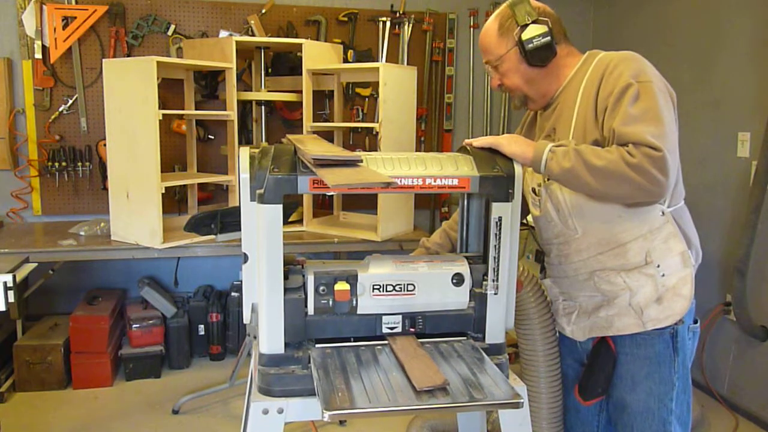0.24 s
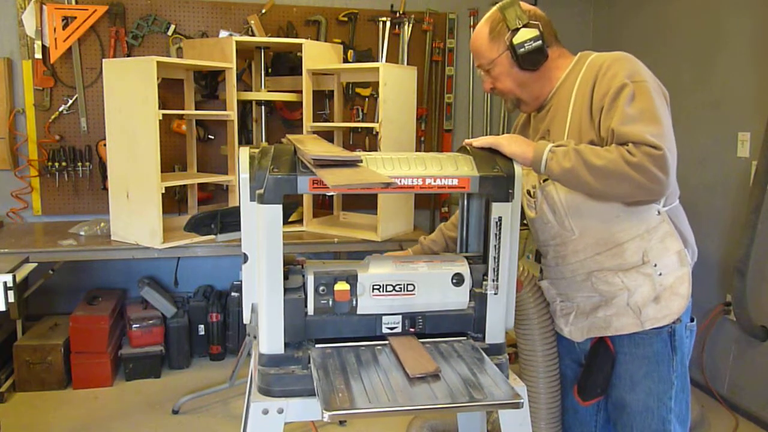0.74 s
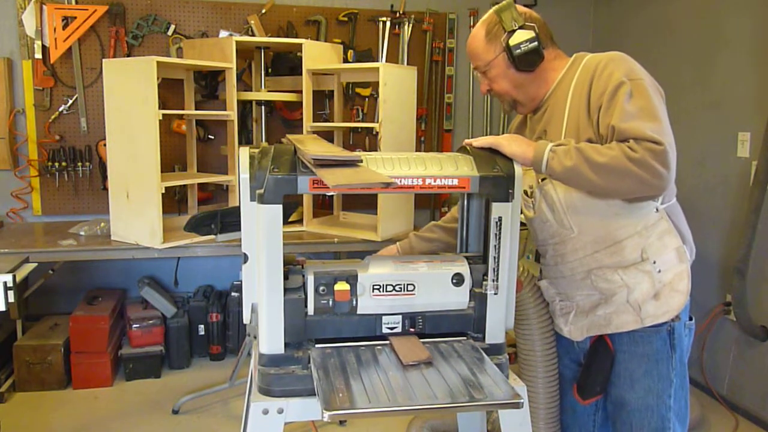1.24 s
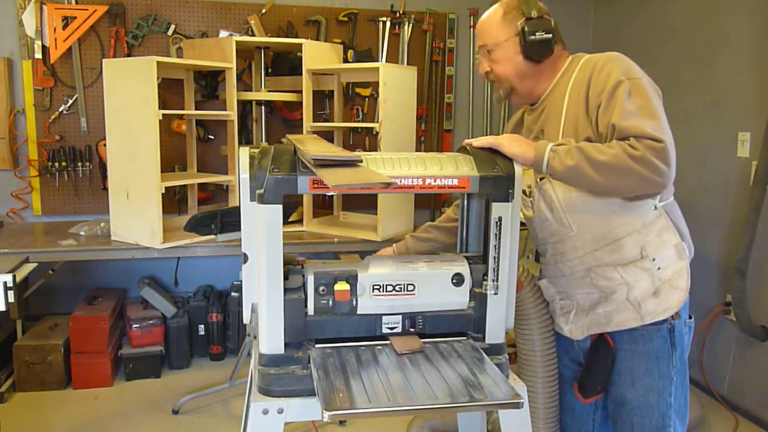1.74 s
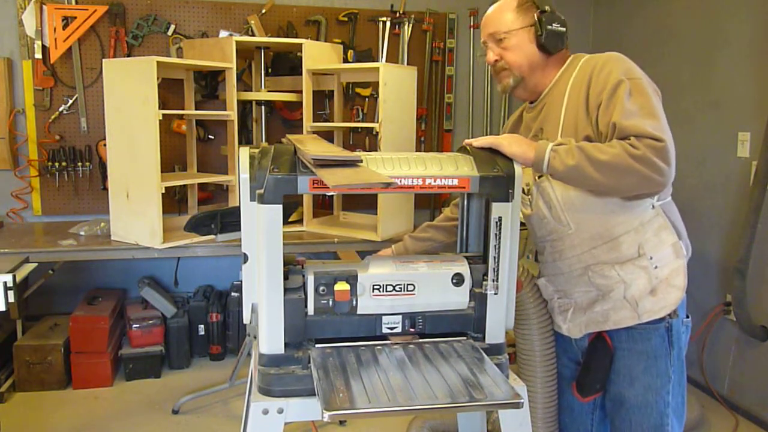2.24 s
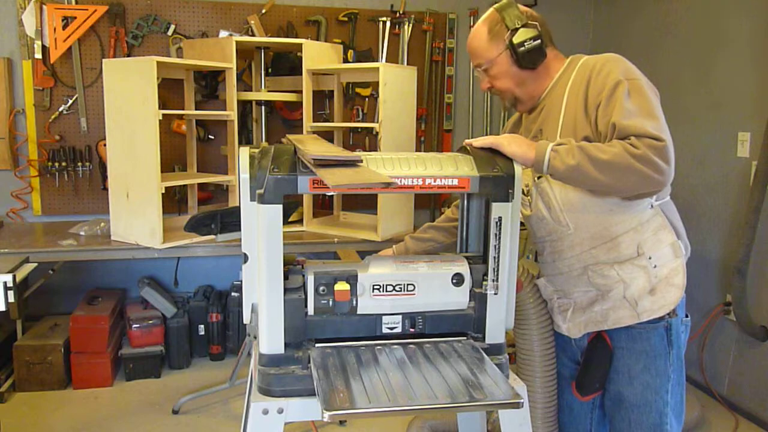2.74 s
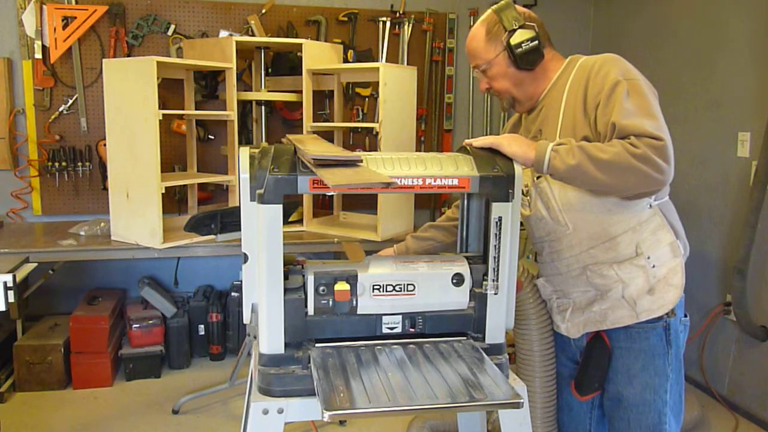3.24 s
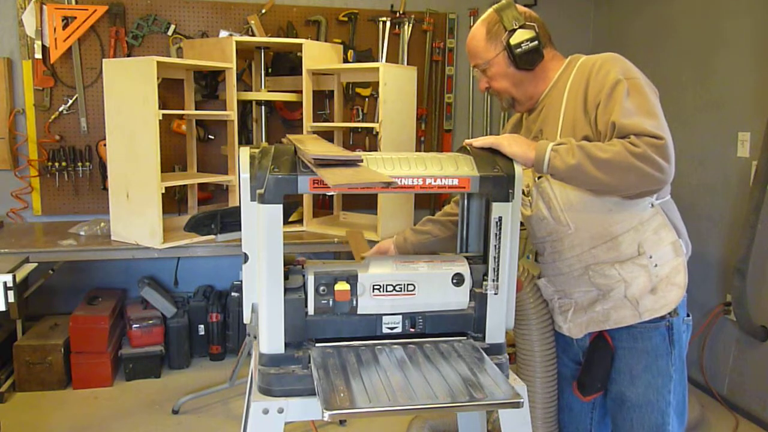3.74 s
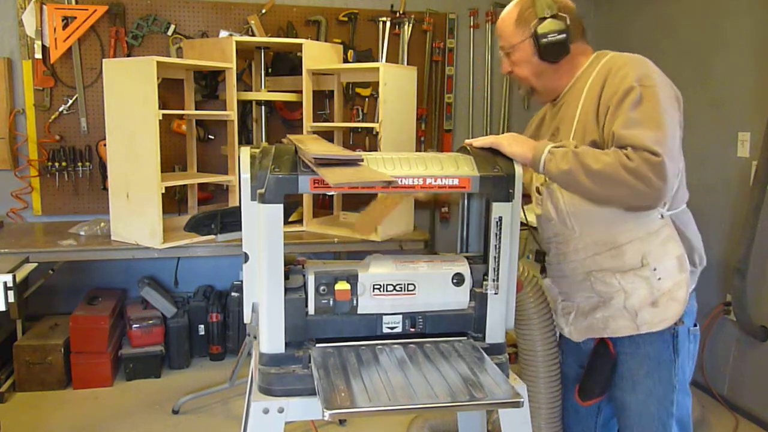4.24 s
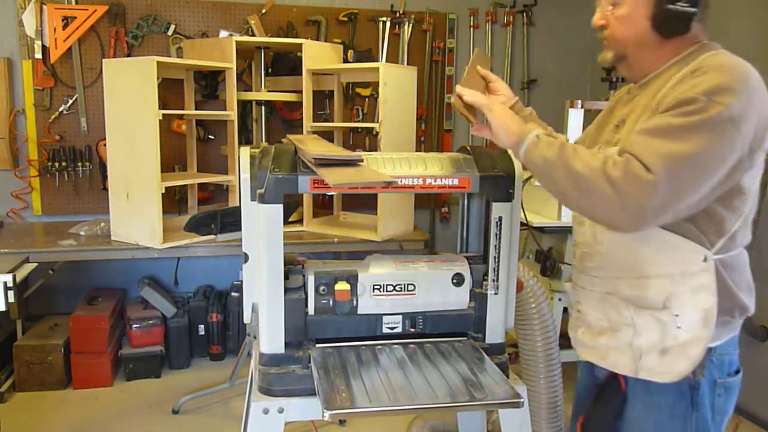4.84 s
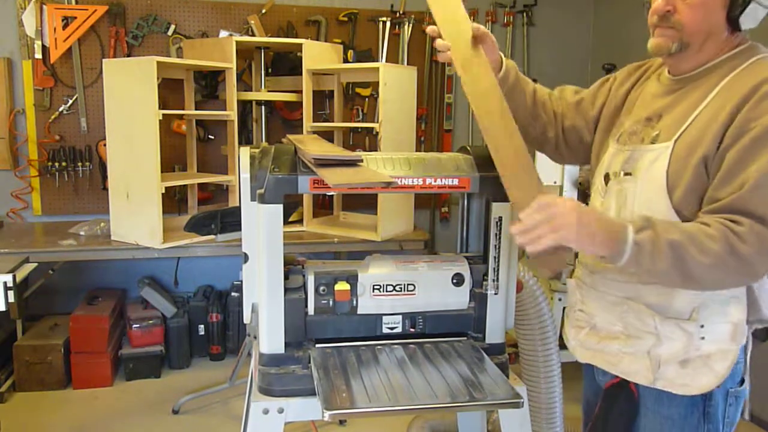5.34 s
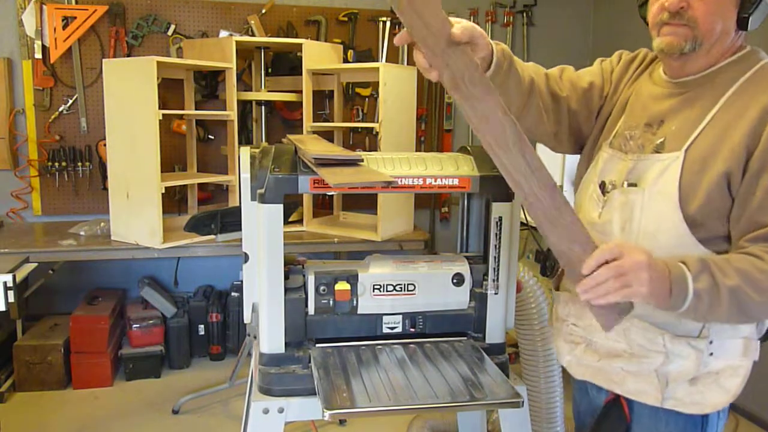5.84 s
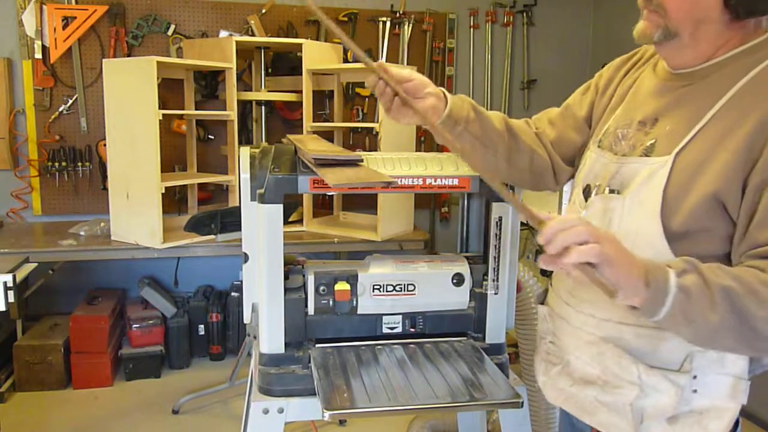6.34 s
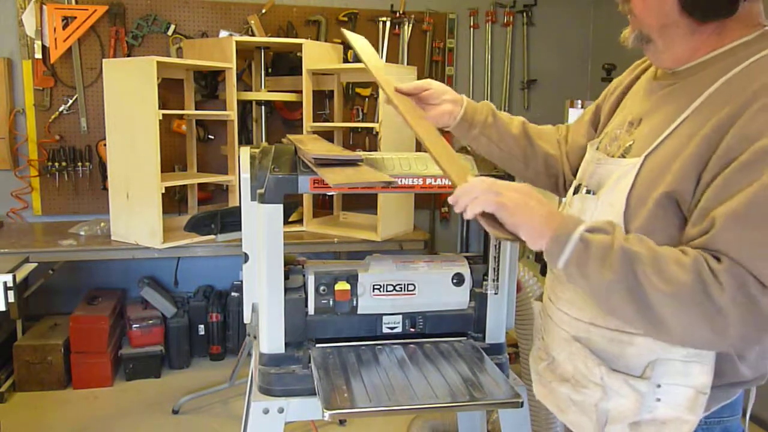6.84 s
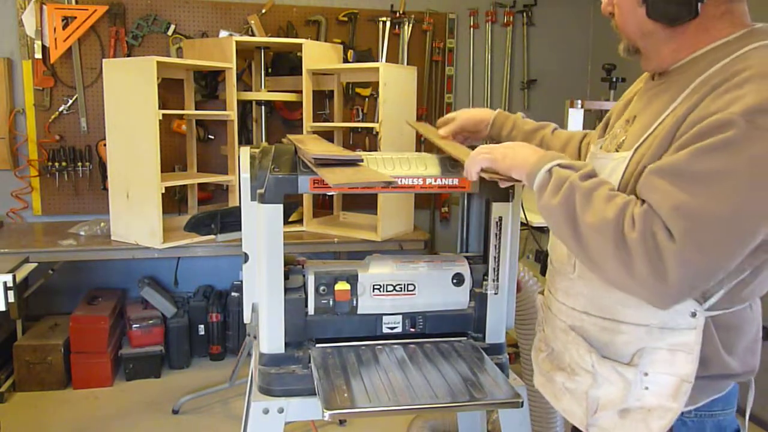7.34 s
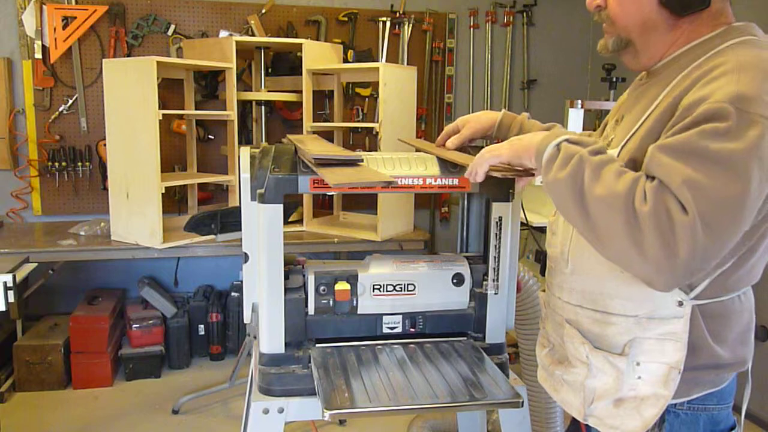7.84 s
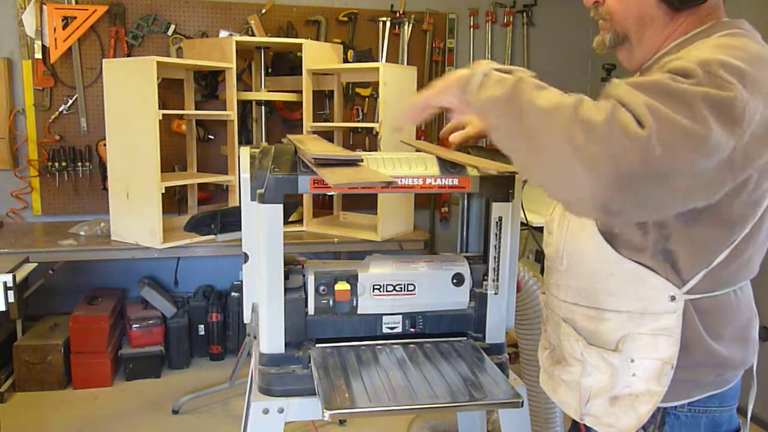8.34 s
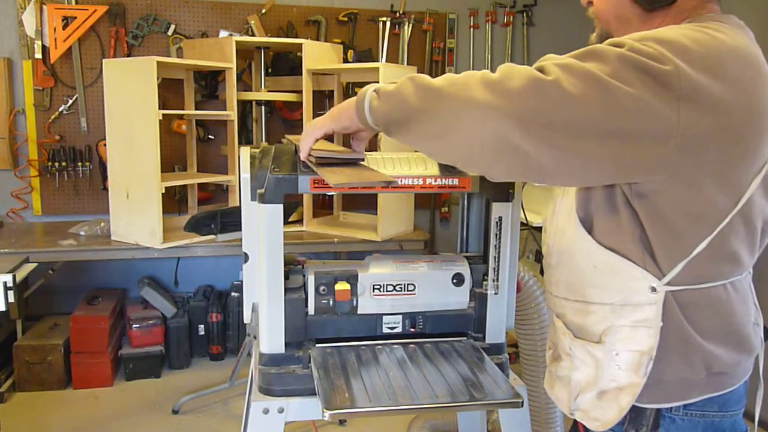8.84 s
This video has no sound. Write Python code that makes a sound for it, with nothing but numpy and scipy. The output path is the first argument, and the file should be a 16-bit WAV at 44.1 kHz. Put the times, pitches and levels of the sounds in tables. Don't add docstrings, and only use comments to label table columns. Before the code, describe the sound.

A dense buzzing cut comes first, its tone colour shifting as the wood feeds through the planer. A brief jittery warble ends the cut, which rings out quickly. Then the cutter head spins free: a smooth siren-like howl, motor whine and rushing air, creeping up in pitch and growing as the camera's gain reopens. Close indoor workshop sound, continuous and never silent.

```python
import sys
import numpy as np
from scipy import signal
from scipy.fft import rfft, irfft
from scipy.io import wavfile
from scipy.ndimage import uniform_filter1d, map_coordinates

SR = 44100
rng = np.random.default_rng(int(sys.argv[2]) if len(sys.argv) > 2 else 0)


def field_ratio(decibels):
    return 10 ** (np.asarray(decibels, dtype=float) / 20)


def unload_audio(sound):
    columns = np.transpose(np.atleast_2d(sound))
    steps = np.round(np.clip(columns, -1, 1) * 32767)
    wavfile.write(sys.argv[1], SR, steps.astype(np.int16))


N = 401310
T = np.arange(N) / SR

# time in seconds, knife rate in Hz, bite force in dB, chip flow in dB.
CUT = [
    (0.0, 295.4, -0.5, -5),
    (0.5, 295, -0.5, -9),
    (1.4, 294.9, 2, -0.5),
    (1.89, 296.4, 0.5, 0),
    (2.35, 294.4, -1, -3.5),
    (2.82, 295.7, 0.5, 1.5),
    (2.92, 295.6, 2.5, 0.5),
    (3.15, 294.4, 1, -1),
    (3.38, 295, 1.5, -10),
]
# multiple of the armature rate, level in dB.
ARMATURE_DB = [(2, -39.5), (4, -45), (5, -45), (6, -43.5), (7, -43), (9, -56.5), (10, -44.5), (11, -43.5),
               (16, -49.5), (18, -58.5)]
# frequency at full speed in Hz, level in dB.
GEARS_HZ_DB = [(167, -48.5), (440, -40.5), (617, -38.5), (773, -54), (857, -39), (967, -42), (1144, -41.5),
               (1492, -45.5)]
# frequency in Hz, density in dB per Hz.
ROAR_SPECTRUM = [(30, -91.5), (80, -86.5), (170, -72), (250, -66.5), (330, -61), (450, -55), (565, -60.5),
                 (650, -56.5), (850, -54.5), (1000, -54.5), (1120, -57.5), (1300, -56), (1700, -61),
                 (2600, -68.5)]
# frequency in Hz, density in dB per Hz.
WHOOSH_SPECTRUM = [(1500, -78.5), (2400, -63.5), (3300, -62.5), (4500, -62.5), (5600, -65), (7200, -68.5),
                   (8000, -77.5), (8900, -101)]
# frequency in Hz, density in dB per Hz.
CHIP_SPECTRUM = [(60, -115), (200, -78), (450, -69), (900, -61), (1600, -68), (3200, -78), (5500, -70),
                 (7000, -71), (8000, -78), (8900, -92)]
# frequency in Hz, width in Hz.
FILTER_NULLS = [(2600, 309), (4600, 492), (5420, 240), (7900, 160), (8100, 130)]
# frequency in Hz, unrelated share in dB, left lead in rad,
# left minus right in dB.
PORTS = [(60, -25, 0, 1), (300, -30.5, .05, 1.23), (900, -21.5, 0.25, 1), (1600, -11, 0.25, 0.5),
         (2800, -4.5, 0.5, -1.5), (3500, -2.5, 0.2, 1.2), (4800, -5, 0.087, 2.3), (7000, -6, -.1, -0.4),
         (8500, -5, 0, -2)]
# frequency in Hz, gain in dB.
LEAK_DB = [(7000, -0.5), (7700, -1), (8000, -4.5), (8260, -10), (8620, -19.5), (8920, -31.5), (9100, -67)]
# frequency in Hz, width in Hz, lift in dB.
EDGE_RING = (8000, 60, 13)
# frequency in Hz, width in Hz, lift in dB.
ROOM_MODES = [(60, 11, 8), (106, 7.4, 11.5), (144, 13, 4), (191.4, 26, 10), (231, 11, 3), (263.3, 20, 10),
              (313.4, 23, 12.5), (392, 9.6, 2), (408, 17, 10), (476, 14, 3), (501, 17, 6.5), (602, 17, 3),
              (754, 6.3, 3.5), (966, 8.5, 6.5)]
BITE_LOW_DB = [-37.5, -30, -32.5, -29.5, -30, -29, -37, -32.5]
# frequency in Hz, level in dB.
BITE_WHOLE_DB = [(2650, -38.5), (3500, -39), (4150, -35.5), (4500, -41), (5500, -32.5), (6800, -37.5),
                 (7700, -43.5), (8600, -64)]
# frequency in Hz, level in dB.
BITE_HALF_DB = [(440, -66.5), (800, -53), (2500, -51), (4200, -41.5), (4600, -44), (5400, -38),
                (6600, -45.5), (8700, -55)]
# centre in seconds,
# length in seconds, multiple of the knife rate, lift in dB.
BOARD_MODES = [(0.03, 0.3, 7, 9), (0.14, .2, 8, 5), (0.42, .2, 7, -7), (0.82, .35, 14, -4),
               (0.74, 0.16, 2, -3.5), (0.55, .25, 10, 3), (0.85, 0.27, 5, -3), (1.1, 0.35, 8, 5),
               (1.14, .15, 7, -13), (1.02, 0.28, 11, 9), (1.26, 0.14, 5, -8), (1.82, 0.95, 5, 7),
               (1.95, 0.44, 7, 11.5), (1.97, .4, 8, -8), (1.83, 0.12, 4, -1), (1.97, .3, 10, -8),
               (2.05, 0.69, 3, 4), (2.13, .35, 14, 7.5), (2.43, 0.28, 6, 5.5), (2.336, 0.45, 2, 2.5),
               (2.45, 0.54, 4, 3), (2.38, .12, 8, -5), (2.52, 0.13, 3, -14), (2.7, .3, 11.5, -5),
               (2.82, 0.33, 5, 9), (2.9, 0.26, 3, 5.5), (2.86, 0.13, 14, 7), (2.8, .2, 22, 5),
               (2.75, .3, 10.5, -8), (2.74, .25, 2, 3)]
# (s, s, multiple, dB).
FLUTTER_MODES = [(2.92, .06, 4, 4), (2.92, .05, 8, 6), (3.0, 0.11, 5, -8), (3.05, .6, 6, -11.5),
                 (3.05, .1, 11.5, 7), (3.05, .1, 7, 6.5), (3.04, 0.049, 1, -5), (3.1, .06, 3, -2),
                 (3.14, 0.2, 2, 6), (3.17, 0.089, 6, 9), (3.17, 0.11, 22, 6.5), (3.23, 0.12, 3, 5.5),
                 (3.25, 0.098, 8, -9), (3.27, .08, 5, 4), (3.3, 0.13, 10, 7), (3.35, .08, 4, 6.5),
                 (3.34, 0.065, 8, 2), (3.34, 0.088, 7, 6), (3.4, .07, 2, -8), (3.36, 0.062, 6, 5)]
SIREN_DB = [-27.5, -21, -26.5, -31]
BRUSH_DB = [-38.5, -33.5, -41]
# frequency in Hz, width in Hz, lift in dB.
STANDING_LOW = [(301.4, 4.3, -15.5), (322.1, 6.6, 6.5), (329.3, 2.9, -3), (638, 5.2, 5),
                (651.4, 8.9, -28.5), (895, 30, -15), (927, 12, -7.5), (982, 3.1, 7), (1220, 22, -8),
                (1297, 5.6, -14), (1324, 5, -14.5), (1038, 11, 0.5), (1338, 6, 1.5), (331, 2, 3.5)]
# frequency in Hz, width in Hz, lift in dB.
STANDING_HIGH = [(3300, 200, -6), (3810, 25, 4), (3858, 30, -7), (3840, 20, 5), (3920, 60, 7),
                 (4038, 35, 9), (4092, 8, 4), (4116, 12, 6), (4166, 18, 10), (4183, 12, 9), (4203, 12, -9)]

ARMATURE_PER_KNIFE = 1.0484
FULL_HZ = 334
LOOSE_S, OUT_S, FADE_S = 2.92, 3.40, 0.21
FREE_HZ, JUMP_SHARE, JUMP_S, SPIN_UP_S = 334.9, 0.12, 0.4, 1.19
BOARD_Q, RING_OUT_DB_PER_S, STAGGER_S = 20, 180, 0.04
JOLT_S, JOLT_PER_S = 0.04, 60
DUCK_DB, DUCK_PER_CHIP_DB, DUCK_PER_FORCE_DB = -17.5, 0.53, 1.7
REOPEN_DB, OPEN_DB_PER_S, OPEN_DB = -10.5, 7, 1
SHADOW_S, SHADOW_LENGTH_S, SHADOW_DB = 5.23, 0.35, -2
WHOOSH_CUT_DB, WHOOSH_FREE_DB, WHOOSH_FOLLOW = 2, -3.5, 0.94
CAMERA_HZ, BASS_CUT_HZ, NULL_DEPTH = 16000, 70, 0.022


def curves(rows):
    s, *columns = np.transpose(rows)
    return [np.interp(T, s, c) for c in columns]


def across(rows, hz):
    at_hz, *columns = np.transpose(rows)
    return [np.interp(np.log(hz + 1), np.log(at_hz), c) for c in columns]


def lift(hz, modes):
    return field_ratio(sum(db / (1 + (2 * (hz - f) / width) ** 2) for f, width, db in modes))


def drift(clock):
    marks = rng.standard_normal((2, int(clock[-1]) + 4))
    coarse = clock[::64]
    re, im = (map_coordinates(m, coarse[None], order=3) for m in marks)
    return np.interp(clock, coarse, re + 1j * im) / np.sqrt(2)


def at_ports(mid, side, lead_rad, pan_db):
    tilt = field_ratio(pan_db / 2) * np.exp(0.5j * lead_rad)
    return np.array([mid * tilt + side, mid / tilt - side])


def air(spectrum, gate=1, flicker_db=0):
    hz = np.fft.rfftfreq(N, 1 / SR)
    share_db, lead_rad, pan_db = across(PORTS, hz)
    flicker = field_ratio(flicker_db * drift(T * 9).real)
    mid, side = rfft(rng.standard_normal((2, N)) * gate * flicker)
    shape = field_ratio(across(spectrum, hz)[0]) * lift(hz, ROOM_MODES) * np.sqrt(SR / 2)
    shape = shape * (hz < spectrum[-1][0])
    return irfft(shape * at_ports(mid, side * field_ratio(share_db), lead_rad, pan_db), N)


def tone(multiple, db, turns, clock, waver, wide=1.0):
    share_db, lead_rad, pan_db = across(PORTS, multiple * FULL_HZ)
    wander = rng.random() + 0.25 * drift(clock / 4).real
    wave = field_ratio(db) * np.sqrt(2) * np.exp(2j * np.pi * (multiple * turns + wander))
    mid = (1 + waver * drift(clock)) / np.sqrt(1 + waver ** 2)
    side = wide * field_ratio(share_db) * drift(clock)
    return (at_ports(mid, side, lead_rad, pan_db) * wave).real


def standing(hz):
    return np.interp(T, T[::256], lift(hz[::256], STANDING_LOW + STANDING_HIGH))


def head_speed(load_hz):
    free_s = np.maximum(T - OUT_S, 0)
    lag = JUMP_SHARE * np.exp(-free_s / JUMP_S) + (1 - JUMP_SHARE) * np.exp(-free_s / SPIN_UP_S)
    return FREE_HZ - (FREE_HZ - load_hz) * lag


def gain_control(force_db, chip_db):
    ducked_db = DUCK_DB - DUCK_PER_CHIP_DB * chip_db - DUCK_PER_FORCE_DB * force_db
    rising_db = REOPEN_DB + OPEN_DB_PER_S * np.maximum(T - OUT_S, 0)
    open_db = uniform_filter1d(np.minimum(rising_db, OPEN_DB), SR // 4)
    open_db = open_db + SHADOW_DB * np.exp(-(2 * (T - SHADOW_S) / SHADOW_LENGTH_S) ** 2)
    return ducked_db, open_db


def hood_roar(gain_db):
    return air(ROAR_SPECTRUM, flicker_db=0.06) * field_ratio(gain_db)


def fan_whoosh(engaged, ducked_db, open_db):
    cut_db = ducked_db + WHOOSH_CUT_DB
    free_db = WHOOSH_FREE_DB + WHOOSH_FOLLOW * open_db
    return air(WHOOSH_SPECTRUM, flicker_db=0.2) * field_ratio(engaged * cut_db + (1 - engaged) * free_db)


def motor(turns, knife_hz, gain_db):
    out = np.zeros((2, N))
    for order, db in zip([1, 3, 12], BRUSH_DB):
        k = order * ARMATURE_PER_KNIFE
        out += tone(k, db + gain_db, turns, T * 9, waver=0.25, wide=0.7) * standing(k * knife_hz)
    for order, db in ARMATURE_DB:
        k = order * ARMATURE_PER_KNIFE
        out += tone(k, db + gain_db, turns, T * 4, waver=1.6) * standing(k * knife_hz)
    for hz, db in GEARS_HZ_DB:
        out += tone(hz / FULL_HZ, db + gain_db, turns, T * 3, waver=0.84)
    return out


def siren(turns, knife_hz, gain_db):
    out = np.zeros((2, N))
    for k, db in enumerate(SIREN_DB, 1):
        out += tone(k, db + gain_db, turns, T * 12, waver=0.082, wide=0.6) * standing(k * knife_hz)
    return out


def flying_chips(turns, chip_db):
    puffs = 1 + 0.3 * np.cos(2 * np.pi * turns)
    return air(CHIP_SPECTRUM, puffs, flicker_db=3.0) * field_ratio(chip_db)


def board_lift_db(multiple, t):
    return sum(db * np.exp(-(BOARD_Q * np.log(multiple / k)) ** 2 - (2 * (t - s) / length_s) ** 4)
               for s, length_s, k, db in BOARD_MODES + FLUTTER_MODES if abs(multiple - k) < 1.6)


def ring_out_db(t):
    return -RING_OUT_DB_PER_S * np.maximum(t - OUT_S + STAGGER_S * rng.random(), 0)


def bite(turns, force_db):
    end = int(3.7 * SR)
    t, turns, force_db = T[:end], turns[:end], force_db[:end]
    jolt = JOLT_PER_S * np.exp(-((t - LOOSE_S - JOLT_S / 2) / JOLT_S * 2) ** 2)
    clock = np.cumsum(np.where(t < LOOSE_S, 5.0, 20.0) + jolt) / SR
    out = np.zeros((2, end))
    for k, low_db in enumerate(BITE_LOW_DB, 1):
        db = low_db + board_lift_db(k, t) + ring_out_db(t)
        out += tone(k, db, turns, clock, waver=0.14, wide=0.61)
    upper = [(k, BITE_WHOLE_DB) for k in range(9, 30)]
    upper += [(k + 0.5, BITE_HALF_DB) for k in range(1, 30)]
    for k, shape in upper:
        db = across(shape, k * CUT[0][1])[0] + force_db + ring_out_db(t)
        if k >= 9:
            db = db + board_lift_db(k, t)
        out += tone(k, db, turns, clock * k / 10.5, waver=1.42)
    return np.pad(out, ((0, 0), (0, N - end)))


def scene():
    load_hz, force_db, chip_db = curves(CUT)
    knife_hz = head_speed(load_hz)
    turns = np.cumsum(knife_hz) / SR
    engaged = np.clip(1 - (T - OUT_S) / FADE_S, 0, 1)
    ducked_db, open_db = gain_control(force_db, chip_db)
    gain_db = engaged * ducked_db + (1 - engaged) * open_db
    mix = hood_roar(gain_db) + fan_whoosh(engaged, ducked_db, open_db)
    mix += motor(turns, knife_hz, gain_db)
    mix += siren(turns, knife_hz, gain_db) * (1 - engaged)
    mix += flying_chips(turns, chip_db) * engaged
    return mix + bite(np.cumsum(load_hz) / SR, force_db)


def band_limit(x):
    return signal.sosfilt(signal.butter(12, 8880, fs=SR, output="sos"), x)


def record(dry):
    hz = np.fft.rfftfreq(N, 1 / SR)
    spectrum = rfft(dry) / (1 + (BASS_CUT_HZ / (hz + 1)) ** 2)
    fold = int(CAMERA_HZ * N / SR)
    spectrum[:, :fold + 1] += np.conj(spectrum[:, fold::-1])
    for f, width, in FILTER_NULLS:
        spectrum = spectrum * (hz - f - 1j * width * NULL_DEPTH) / (hz - f - 1j * width)
    spectrum = spectrum * lift(hz, [EDGE_RING]) * field_ratio(across(LEAK_DB, hz)[0])
    mix = irfft(spectrum, N)
    return band_limit(mix)


dry = scene()
out = record(dry)
unload_audio(out)
```